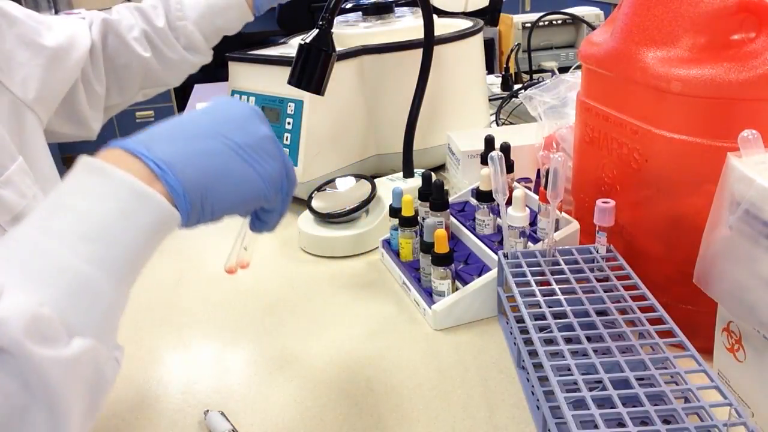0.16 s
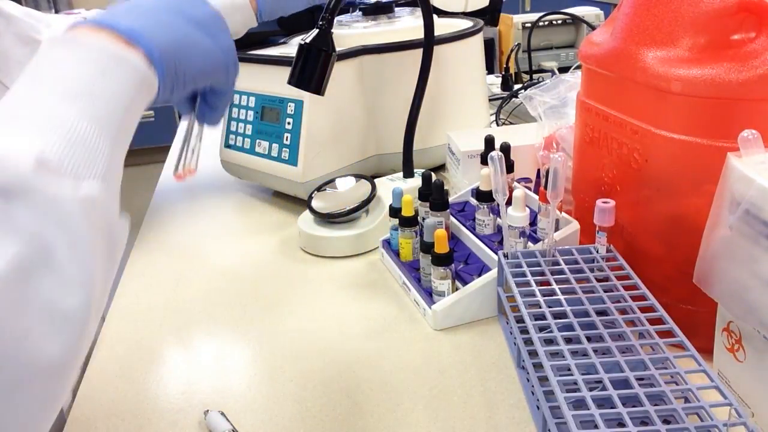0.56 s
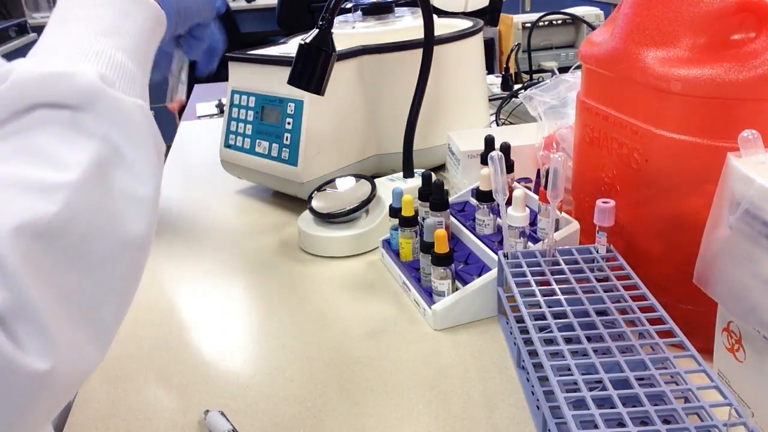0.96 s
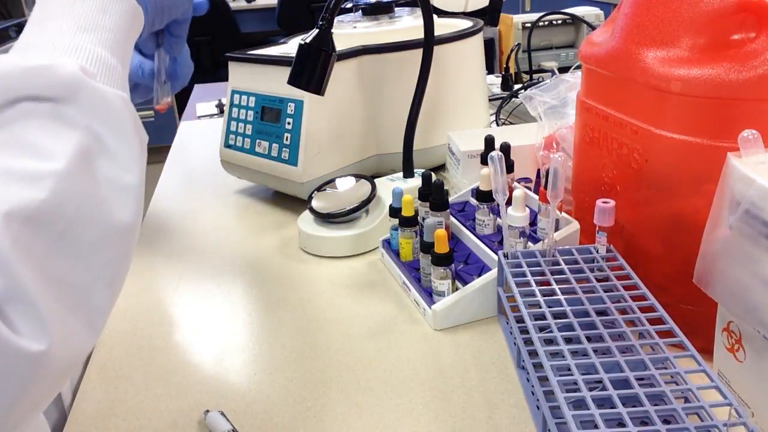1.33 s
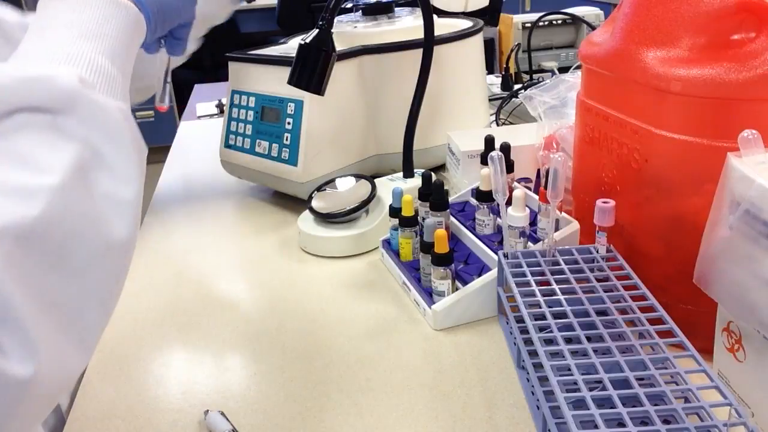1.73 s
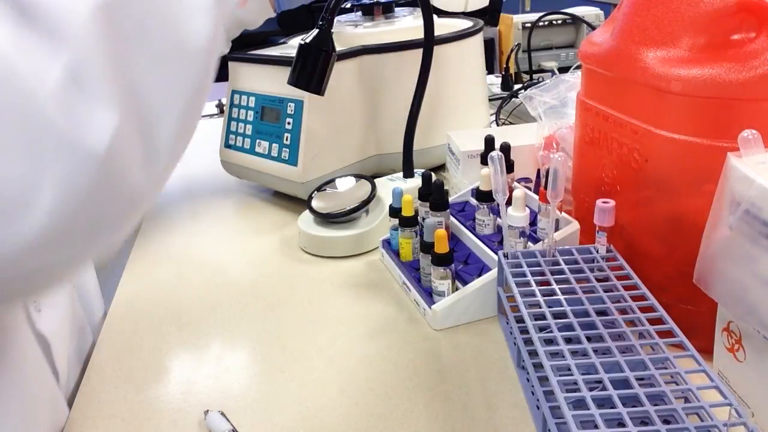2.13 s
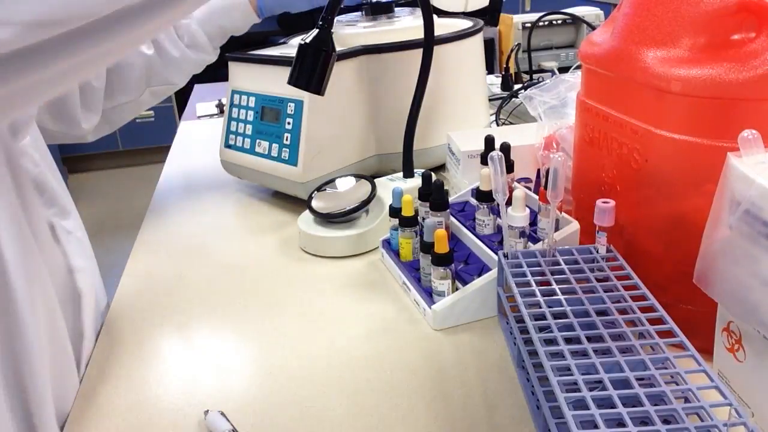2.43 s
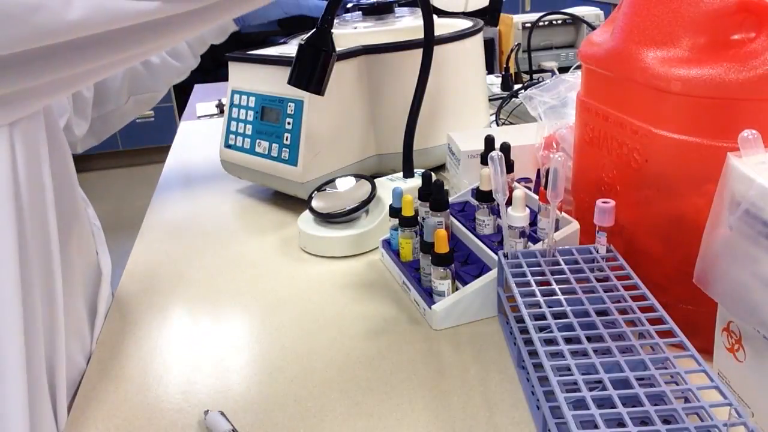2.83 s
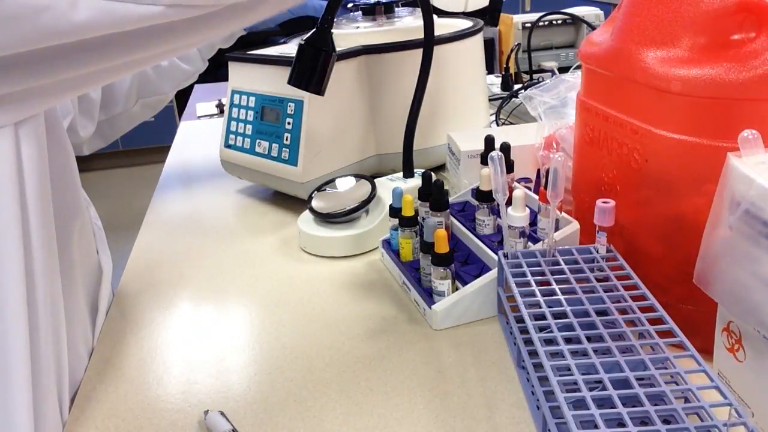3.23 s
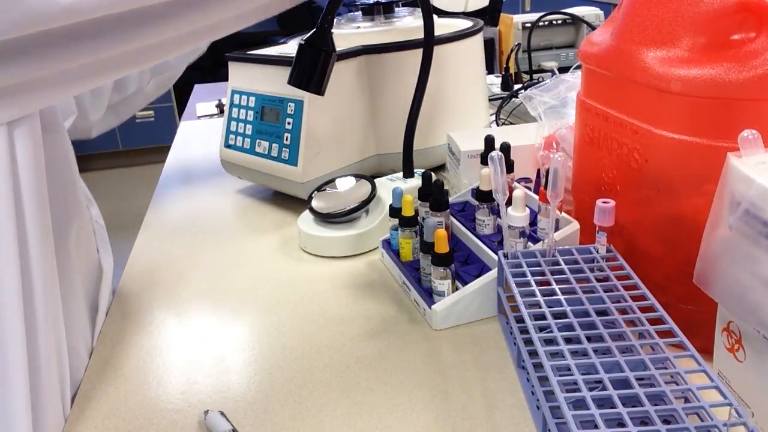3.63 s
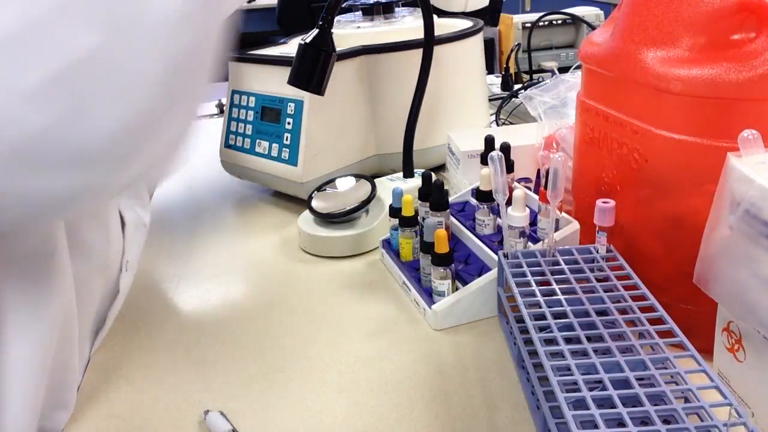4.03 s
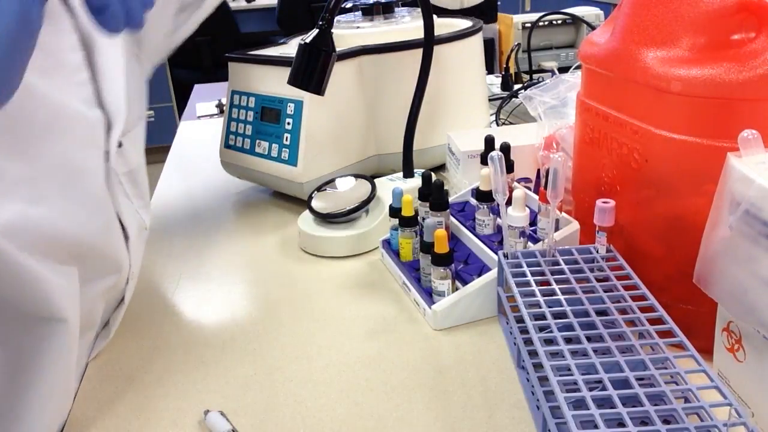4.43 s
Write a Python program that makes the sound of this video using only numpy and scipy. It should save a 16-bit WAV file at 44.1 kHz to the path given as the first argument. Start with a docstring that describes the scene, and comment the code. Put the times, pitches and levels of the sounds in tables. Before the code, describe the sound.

In a small hard laboratory room, low ventilation rush and motor hum run throughout. Close to the microphone, small glass tubes clink and tap on a rack in irregular clusters, with coat sleeves rustling and a gloved hand rubbing faintly. After fainter ticks, one tube drops into the rack with a loud bright clack and rattles to rest in quickening bounces. A few tiny taps and a soft hollow bump end it.

```python
"""Laboratory bench in a small hard room: small glass test tubes are set into a rack of hard sleeves.
Ventilation is coloured noise, motor sines and a wavering drone; coat and glove are shaped noise.
Taps on rims, glass and rack are decaying modes with noise clatter; so is a bumped hollow housing near the end.
One tube drops to the bottom of its sleeve and bounces to rest: sleeve modes, side jangle and glass ticks.
Blows and rubs get a diffuse room tail."""
import sys
import numpy as np
from scipy import signal
from scipy.fft import rfft, irfft
from scipy.io import wavfile
from scipy.ndimage import uniform_filter1d

SR = 44100
rng = np.random.default_rng(int(sys.argv[2]) if len(sys.argv) > 2 else 0)


def inscribe(sig):
    """Save sig as 16-bit PCM at rate SR to the path in sys.argv[1].

    A 1-D sig is mono; a 2-D sig holds one channel per row.
    Samples are clipped to [-1, 1] before scaling.
    """
    pcm = np.round(np.clip(np.atleast_2d(sig).T, -1, 1) * 32767)
    wavfile.write(sys.argv[1], SR, pcm.astype(np.int16))


N = 201986
TIME = np.arange(N) / SR
RING = TIME[:SR // 4]  # time axis of one blow

# Rushing air. Each row: frequency in Hz, relative density in dB per Hz.
AIR_SPECTRUM = [(15, -78), (25, -57), (53, -39), (102, -13), (212, -1), (242, -4.5), (263, -9.5), (317, -5),
                (416, -11.5), (607, -14.5), (840, -22), (1190, -23.5), (1740, -34), (14800, -35),
                (16000, -63)]
# Motor lines. Each row: frequency in Hz, mean level in dB.
HUM_LINES = [(120, -80.5), (241, -69), (323, -77.5), (619, -76), (721, -80)]
# Low drone, before its waver. Each row: time in seconds, level in dB.
DRONE_LEVEL = [(0.0, -68.5), (0.79, -68.5), (0.85, -61.5), (1.22, -79.5), (1.26, -87), (1.47, -69),
               (1.95, -75.5), (2.42, -55.5), (2.64, -61), (3.37, -59.5), (4.17, -71), (4.58, -71)]
# Cloth friction. Each row: frequency in Hz, relative density in dB per Hz.
CLOTH_SPECTRUM = [(300, -7.5), (700, 4), (1300, 2.5), (2500, -0.5), (5000, -4.5), (9000, -6.5),
                  (13000, -6.5), (16000, -8)]
# Strokes of the coat sleeve. Each row: middle in seconds, half length in seconds, level in dB.
SWISHES = [(0.044, 0.046, -63.5), (0.735, 0.34, -67), (1.54, 0.038, -70), (2.475, 0.45, -60),
           (3.4, 0.12, -67.5), (4.053, 0.43, -60.5), (4.58, 0.089, -59.5)]
# Rubs of glove and cuff. Each row: middle in seconds, half length in seconds, level in dB,
# lowest frequency in Hz, highest frequency in Hz.
RUBS = [(0.576, 0.019, -60, 494, 900), (.64, 0.028, -56.5, 350, 760), (0.788, 0.04, -59.5, 400, 760),
        (1.486, 0.034, -77, 4600, 5640), (1.555, .02, -70, 4600, 5640), (3.9, 0.34, -66.5, 320, 520)]
# Bumped hollow housing. Each row: frequency in Hz, relative level in dB, t60 in seconds.
HOUSING_MODES = [(256.8, -5, 0.8), (320, -18, 0.087), (638, -21, 0.23)]
# Reflections from the bench and the apparatus on it. Each row: delay in seconds, relative level in dB.
ECHOES = [(.0023, -2), (.0070, -3), (.0093, -6), (.0145, -13)]
# Dull knock of the rack. Each row: frequency in Hz, relative level in dB, t60 in seconds.
RACK_MODES = [(412, -10, 0.05), (524, -3, 0.16), (998, -3, .06), (1075, -7, .14), (1110, 0, 0.05),
              (1160, -8, .06), (1205, -10, .06)]
# High modes of the thin glass wall. Each row: frequency in Hz, relative level in dB, nominal t60 in seconds.
WALL_MODES = [(5480, -7, .04), (5750, -5, .04), (6180, -9, .04), (6535, -3, .05), (6660, -4, .05),
              (6900, -7, .04), (7450, -10, .04), (8000, -9, .04), (8800, -5, .05), (9500, -5, .06),
              (10400, -8, .05), (11400, -5, .05), (12050, -6, .05), (12500, -8, .05), (13550, -10, .06)]
# Rim of a sleeve. Each row: frequency in Hz, relative level in dB, nominal t60 in seconds.
RIM_MODES = [(1555, -4, .055), (1668, -9, .05), (1714, 0, .08), (1745, -5, .11), (1808, -7, .12),
             (1846, -9, .12), (1902, -13, .1), (2000, -14, .07), (2140, -5, .12), (2258, -11, .08),
             (2350, -15, .08), (2495, -8, .05), (2580, -2.5, .08), (2620, -5, .09), (2695, -6, .1),
             (2740, -11, .09), (2800, -7, .1), (2935, -14, .07)]
# Tapped tube. Each row: frequency in Hz, relative level in dB, nominal t60 in seconds.
GLASS_MODES = [(3130, -5, .08), (3240, 0, .09), (3337, -4, .07), (3456, -5, .09), (3496, -5, .08),
               (3555, -9, .07), (3712, -6, .1), (3812, -6, .08), (3920, -8, .08), (4085, -8, .06),
               (4182, -6, .05), (4425, -7, .05), (4559, 0, .115), (4600, 8, .022), (4621, -5, .08),
               (4715, -11, .06), (4800, -12, .04), (5195, -10, .05)]
# Light taps. Each row: start in seconds, rim level in dB, favoured rim pitch in Hz, its spread in octaves,
# tube level in dB, favoured tube pitch in Hz, ring length as a factor on t60, clatter against ring in dB,
# rack knock level in dB, favoured rack pitch in Hz, glass tick level in dB.
TAPS = [(0.3777, -50.5, 1750, 1.1, -56.5, 3640, 0.81, -7, -57, 1120, -61),
        (0.4852, -43.5, 2270, 0.29, -52, 4440, 0.69, -4, -50, 990, -51.5),
        (0.4906, -42.5, 2840, 0.089, -53, 3330, 0.93, -7, -55, 520, -77),
        (0.659, -53, 1600, 1.6, -65, 4400, 1.2, -8, -66, 1110, -67.5),
        (0.7223, -40.5, 2210, 0.49, -56, 4160, 0.5, -1.5, -56.5, 1240, -57),
        (0.7322, -46, 1835, 0.091, -74, 3900, 1.6, -10, -62, 520, -80),
        (2.1112, -47.5, 1640, 0.16, -63, 3920, 0.36, -11, -50.5, 1120, -61.5),
        (2.1132, -49.5, 2150, 0.11, -77, 4300, 0.7, -16, -58, 520, -75),
        (2.2948, -47, 2750, 0.31, -47.5, 3300, 1.1, -5, -56, 1110, -55),
        (2.325, -58, 1900, .8, -56, 4100, 0.54, 2, -76, 1100, -66),
        (2.367, -48.5, 2720, 0.25, -52, 3400, 2.1, 1, -65, 1100, -54.5),
        (2.3793, -45.5, 1600, 1.2, -33.7, 4630, 0.48, -4, -55, 1130, -44.5),
        (2.549, -41, 2230, 0.28, -58.5, 4300, 0.56, -15, -54.5, 1190, -67),
        (2.617, -64, 1980, 1.2, -63, 4030, 0.41, -2, -86, 1100, -65),
        (2.869, -57.5, 2700, 0.87, -60.5, 3780, 0.86, -3, -79, 1090, -68.5),
        (3.068, -63, 1623, 0.34, -80, 4300, 0.96, -18, -59.5, 1110, -74),
        (3.268, -63.5, 2700, 0.65, -71, 3620, 3.4, -6, -77, 1100, -76),
        (3.2963, -56.5, 2700, 0.16, -52, 4300, 0.76, -2, -62.5, 1160, -59.5),
        (3.3226, -54.5, 2850, 0.8, -46, 3540, 0.77, -1, -57, 1120, -62),
        (3.379, -61.5, 2300, 0.42, -67, 3500, 0.9, -10, -86, 1100, -83),
        (3.387, -62, 2200, 0.28, -72, 3500, 0.83, -3, -85, 1100, -85),
        (3.482, -62, 1600, 1.0, -51, 4200, 0.48, -2.5, -70, 1100, -63),
        (4.402, -66, 1800, 1, -73, 3800, 0.72, -6, -66.5, 1110, -85),
        (4.435, -68, 2500, .5, -76, 3700, 0.5, -7, -78, 1100, -90),
        (4.487, -64.5, 2230, 1.3, -64.5, 4500, .5, -4, -80, 1100, -72)]
# Tube at the bottom of its sleeve. Each row: frequency in Hz, relative level in dB, t60 in seconds.
SLEEVE_MODES = [(1154, -4.5, .07), (1660, -8, .035), (1713, -3.5, .05), (2140, -8, .04), (2530, -3, .028),
                (2592, 1.5, .034), (1812, -12, .1), (1997, -12, .07), (2254, -14, .08), (2350, -17, .05),
                (2445, -16, .05), (2680, -13, .055), (2790, -16, .06), (3210, -18, .06), (3811, -14.5, .11),
                (3910, -18, .09), (4550, -9, .055), (5800, -17, .04)]
# Bounces of the dropped tube. Each row: start in seconds, level in dB, extra jangle in dB,
# tilt in dB per octave, glass tick level in dB.
BOUNCES = [(3.7022, -23.3, 2, 0, -41.5), (3.7524, -28.3, -1, 0, -47.5), (3.7848, -32.5, 0, -1, -51),
           (3.8070, -35.5, 0, -2, -53.5), (3.8235, -36.5, 0, -3, -56), (3.8375, -43.5, 0, -2, -59),
           (3.8525, -42.5, 0, -6, -70), (3.8635, -46, -1, -8, -78)]

AIR_DB, DRONE_HZ, DRONE_WIDTH_HZ = -60, 144, 8
RUSTLE_DB = -72  # cloth between strokes
BUMP_S, BUMP_DB = 4.509, -44.5
CONTACT_S, CRACK_T60_S, JANGLE_T60_S = .0006, .018, .03
GLASS_SPREAD_OCT, RACK_SPREAD_OCT, UNFAVOURED_DB = .26, .14, -18
SLEEVE_DETUNE = .002  # relative spread
JANGLE_DB, STRIKE_DB = -6, -17  # against the ring of a bounce
DROP_KNOCK_HZ, DROP_KNOCK_DB = 500, -36  # level against the bounce
ROOM_T60_S, ROOM_TREBLE_T60_S, ROOM_DB = 0.3, 0.21, -12
TOP_HZ = 15600


def undb(db):
    """Decibels to gain."""
    return 10 ** (np.asarray(db) / 20)


def level(x, db):
    """Set the rms of a steady sound."""
    return x * undb(db) / np.sqrt(np.mean(x ** 2))


def blow_level(x, db):
    """Set the rms of the first fortieth of a second of a blow."""
    return x * undb(db) / np.sqrt(np.mean(x[:SR // 40] ** 2))


def curve(rows):
    """Join (s, value) rows by straight lines."""
    return np.interp(TIME, *np.transpose(rows))


def band(x, lo_hz, hi_hz, order=2):
    """Causal Butterworth band-pass."""
    edges_hz = [lo_hz, min(hi_hz, SR / 2 - 100)]
    return signal.sosfilt(signal.butter(order, edges_hz, "band", fs=SR, output="sos"), x)


def noise(points):
    """Noise coloured by (Hz, dB) points, interpolated over log frequency."""
    hz, db = np.transpose(points)
    bins_hz = np.maximum(np.arange(N // 2 + 1) * SR / N, 1)
    gain = undb(np.interp(np.log(bins_hz), np.log(hz), db))
    return irfft(rfft(rng.standard_normal(N)) * gain, N)


def walk(rate_hz):
    """Smoothed random steps of unit rms."""
    k = int(SR / rate_hz)
    held = np.repeat(rng.standard_normal(N // k + 1), k)
    smooth = uniform_filter1d(uniform_filter1d(held, k), k)
    return level(smooth[:N], 0)


def add(out, s, x):
    """Mix x into out from time s."""
    i = int(max(s, 0) * SR)
    out[i:i + len(x)] += x[:max(len(out) - i, 0)]


def ring(modes, detune, build_s, scatter_db=0, length=1):
    """Decaying modes that swell in briefly; each contact shifts their pitch and strength a little."""
    hz, db, t60 = np.transpose(modes)[:, :, None]
    shift, phase, strength = rng.standard_normal((len(modes), 3)).T[:, :, None]
    waves = np.sin(2 * np.pi * (hz * (1 + detune * shift) * RING + phase))
    fade = np.exp(-np.log(1000) * RING / (t60 * length))
    tones = np.sum(undb(db + scatter_db * strength) * waves * fade, axis=0)
    return tones * (1 - np.exp(-RING / build_s))


def burst(t60):
    """Countless weak modes, as noise, that swell in during the contact and die together."""
    fade = np.exp(-np.log(1000) * RING / t60)
    return rng.standard_normal(len(RING)) * fade * (1 - np.exp(-RING / CONTACT_S))


def even(x, bins=60):
    """Flatten the spectrum of a decaying noise: so many modes overlap that no pitch is favoured."""
    spectrum = rfft(x, 2 * len(RING))
    smooth_power = uniform_filter1d(np.abs(spectrum) ** 2, size=bins)
    return irfft(spectrum / np.sqrt(smooth_power))[:len(RING)]


def reflect(x, echo_db, moved_s=0):
    """Nearby surfaces repeat a blow within milliseconds; the paths change as the tube moves."""
    out = x.copy()
    for (delay_s, db), shift in zip(ECHOES, rng.standard_normal(len(ECHOES))):
        add(out, delay_s + moved_s * shift, undb(db + echo_db) * x)
    return out


def favour(modes, hz, spread_oct):
    """The place of contact excites the modes near one pitch most."""
    mode_hz, db, t60 = np.transpose(modes)
    favour_db = np.maximum(-6 * (np.log2(mode_hz / hz) / spread_oct) ** 2, UNFAVOURED_DB)
    return np.transpose([mode_hz, db + favour_db, t60])


def ventilation():
    """Rushing air, motor lines and a drone that wavers in pitch and level."""
    air = level(noise(AIR_SPECTRUM), AIR_DB) * undb(.5 * walk(5.93))
    hum = np.zeros(N)
    for hz, db in HUM_LINES:
        gain = np.sqrt(2) * undb(db + 0.5 * walk(4.45))
        hum += gain * np.sin(2 * np.pi * hz * TIME + 0.42 * walk(4.32))
    drone_hz = DRONE_HZ + .5 * DRONE_WIDTH_HZ * walk(15)
    phase = 2 * np.pi * np.cumsum(drone_hz) / SR
    drone = np.sqrt(2) * np.sin(phase) * undb(curve(DRONE_LEVEL) + 2.9 * walk(14))
    return air + hum + drone


def coat():
    """Cloth slides on cloth, a little unevenly; each stroke of the arm swells and fades."""
    uneven_db = 1.4 * walk(35)
    power = undb(RUSTLE_DB) ** 2
    for s, half_s, db in SWISHES:
        power = power + undb(db) ** 2 * np.exp(-2 * ((TIME - s) / half_s) ** 2)
    return level(noise(CLOTH_SPECTRUM), 0) * np.sqrt(power) * undb(uneven_db)


def glove():
    """Rubber and cuff stick and slip on tubes and rack: faint, grainy rubs, each in one band."""
    out = np.zeros(N)
    for s, half_s, db, lo_hz, hi_hz in RUBS:
        slips = rng.standard_normal(N) * undb(5 * walk(300))
        swell = np.exp(-((TIME - s) / half_s) ** 2)
        out += level(band(slips, lo_hz, hi_hz), db) * swell
    return out


def bump():
    """A soft knock on a hollow housing: a few low modes and a band of decaying noise."""
    out = np.zeros(N)
    thud = ring(HOUSING_MODES, detune=0.0032, build_s=0.0023)
    thud = thud + undb(7) * band(burst(.11), 200, 600, order=3)
    add(out, BUMP_S, blow_level(band(thud, 120, 3000), BUMP_DB))
    return out


def knock(hz):
    """The rack gives under a tap with a low, hollow note."""
    tones = ring(favour(RACK_MODES, hz, RACK_SPREAD_OCT), detune=.003, build_s=.004, scatter_db=1)
    return blow_level(tones, 0) + blow_level(band(even(burst(0.15)), 330, 1300), -7.5)


def tick(db):
    """The hard contact of glass: a short crack while the wall rings."""
    wall = ring(WALL_MODES, detune=.014, build_s=.0001, scatter_db=2.5, length=.7)
    crack = undb(23) * band(even(burst(CRACK_T60_S)), 1800, 11000, order=1)
    return blow_level(reflect(wall + crack, echo_db=-8, moved_s=0.00021), db)


def clink(modes, hz, spread_oct, length, clatter_db, echo_db):
    """Modes near the favoured pitch ring most, over a short clatter of weaker ones."""
    favoured = favour(modes, hz, spread_oct)
    tones = ring(favoured, detune=.0012, build_s=.0009, scatter_db=.7, length=length)
    tones = reflect(tones, echo_db, moved_s=.00002)
    clatter = burst(.07 * length) + 2 * burst(.012)
    clatter = even(reflect(clatter, echo_db=-3, moved_s=.001))
    edge = 2 ** max(spread_oct, .25)
    clatter = band(clatter, max(hz / edge, modes[0][0]), min(hz * edge, modes[-1][0]))
    return blow_level(tones, 0) + blow_level(clatter, clatter_db)


def taps():
    """The place of contact decides which modes a tap favours, the grip of the glove how long they ring."""
    out = np.zeros(N)
    for (s, rim_db, rim_hz, spread_oct, glass_db, glass_hz, length, clatter_db,
         knock_db, knock_hz, tick_db) in TAPS:
        rim = clink(RIM_MODES, rim_hz, spread_oct, length, clatter_db, echo_db=-5)
        glass = clink(GLASS_MODES, glass_hz, GLASS_SPREAD_OCT, length, clatter_db - 3, echo_db=-9)
        add(out, s, blow_level(rim, rim_db))
        add(out, s, blow_level(glass, glass_db))
        add(out, s, blow_level(knock(knock_hz), knock_db))
        add(out, s, tick(tick_db))
    return out


def dropped_tube():
    """The round end strikes the sleeve bottom and rebounds, jangling on its side and knocking the rack."""
    out = np.zeros(N)
    lowest_hz = SLEEVE_MODES[0][0]
    for s, db, jangle_db, tilt_db, tick_db in BOUNCES:
        modes = [(hz, mode_db + tilt_db * np.log2(hz / lowest_hz), t60) for hz, mode_db, t60 in SLEEVE_MODES]
        body = reflect(ring(modes, SLEEVE_DETUNE, build_s=.0008, scatter_db=1), echo_db=-2)
        jangle = even(reflect(burst(JANGLE_T60_S), echo_db=1, moved_s=.00055))
        strike = even(reflect(burst(.02), echo_db=-8, moved_s=.00055))
        blow = blow_level(body, 0)
        blow = blow + blow_level(band(jangle, 1700, 2660), JANGLE_DB + jangle_db)
        blow = blow + blow_level(band(strike, 2700, 5700), STRIKE_DB)
        add(out, s, blow_level(band(blow, 1100, 11000, order=4), db))
        add(out, s, tick(tick_db))
        add(out, s, blow_level(knock(DROP_KNOCK_HZ), db + DROP_KNOCK_DB))
    return out


def room(x, onset_s=0.014, split_hz=4000):
    """A diffuse tail that builds up after the first reflections and loses its treble sooner."""
    low = band(even(burst(ROOM_T60_S), bins=8), 100, split_hz)
    treble = band(even(burst(ROOM_TREBLE_T60_S), bins=8), split_hz, 15800)
    tail = (low + undb(1.5) * treble) * (1 - np.exp(-(RING / onset_s) ** 2))
    tail = tail / np.sqrt(np.sum(tail ** 2))
    return x + undb(ROOM_DB) * signal.fftconvolve(x, tail)[:N]


def scene():
    """Everything on the bench, heard from one point; only blows and rubs pass through the room."""
    bench = taps() + dropped_tube() + bump() + glove()
    return (room(bench) + coat() + ventilation())[None]


def record(dry):
    """Steep elliptic low-pass: next to nothing remains above the top frequency."""
    return signal.sosfilt(signal.ellip(8, .2, 70, TOP_HZ, fs=SR, output="sos"), dry)


dry = scene()
out = record(dry)
inscribe(out)
```